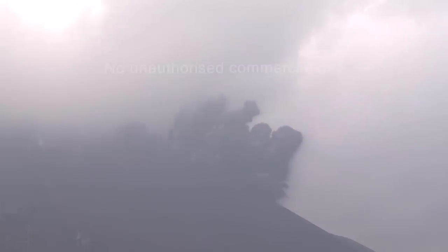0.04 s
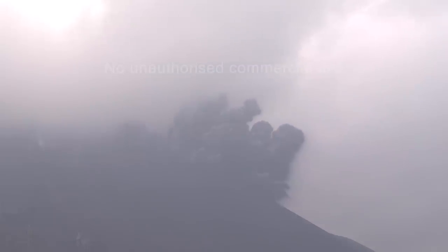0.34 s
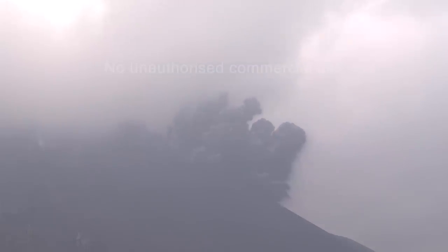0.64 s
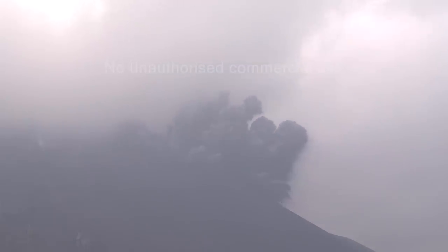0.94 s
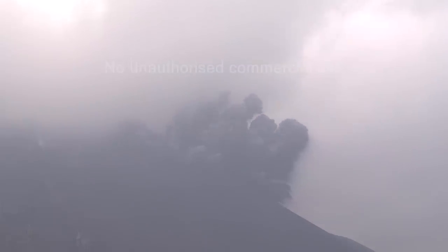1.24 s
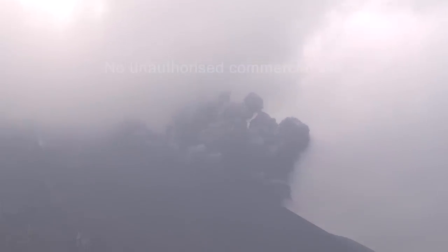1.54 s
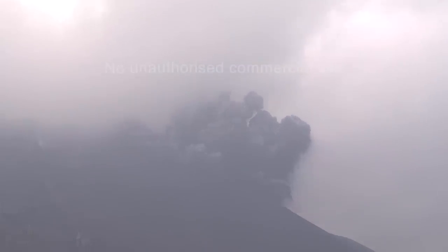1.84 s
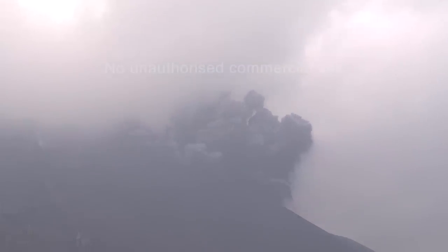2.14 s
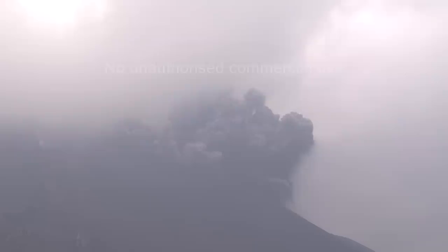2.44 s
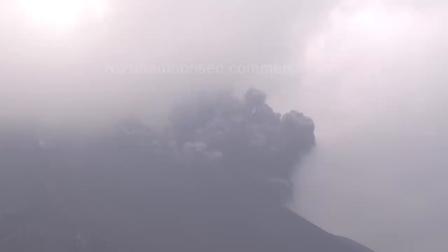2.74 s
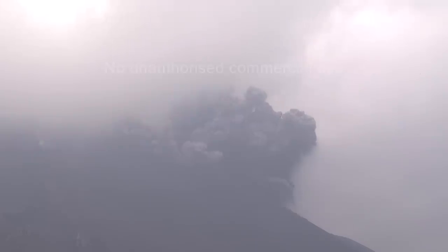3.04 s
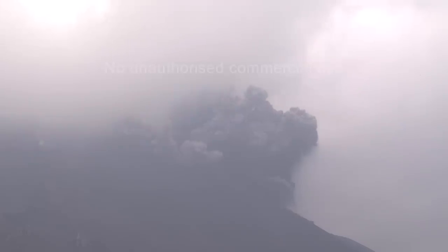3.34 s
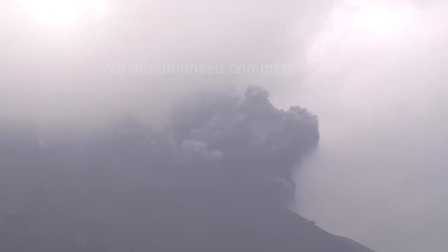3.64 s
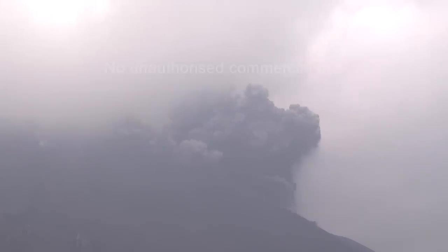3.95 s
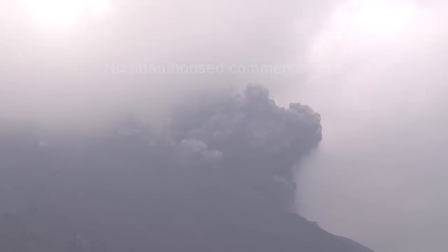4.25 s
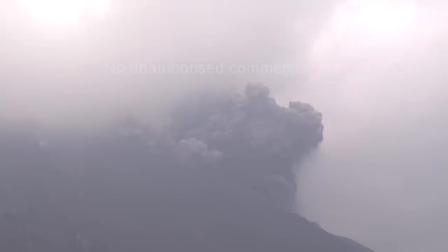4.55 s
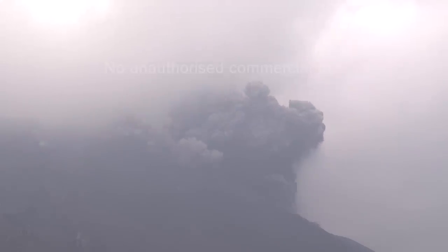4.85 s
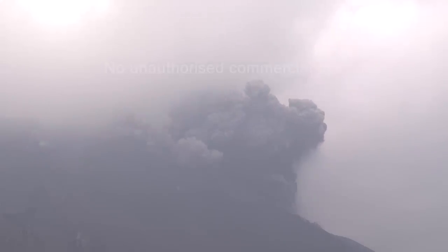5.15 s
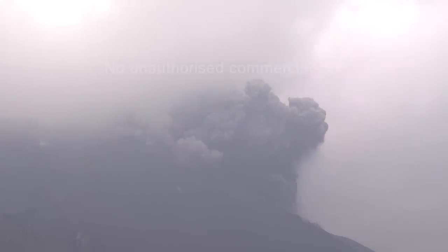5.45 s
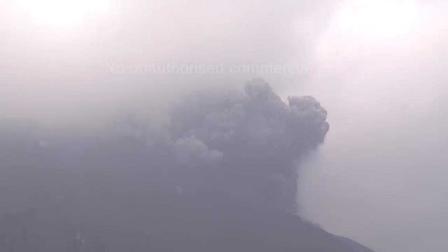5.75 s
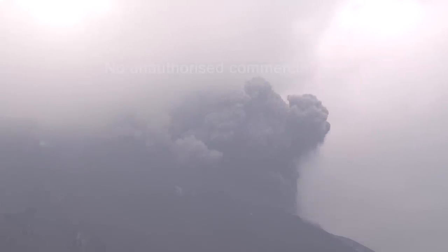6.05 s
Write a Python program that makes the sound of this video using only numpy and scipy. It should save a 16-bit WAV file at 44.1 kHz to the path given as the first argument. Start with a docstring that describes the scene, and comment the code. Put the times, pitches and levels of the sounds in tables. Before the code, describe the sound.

Wind buffets the microphone, a few dull pops hit, then a distant volcanic eruption roars and rumbles in surges.

```python
"""Far volcano in the wind

An ash cloud rolls down a far volcano while wind buffets the two ports of a camera microphone.
One blast overloads the ports with a few dull pops; then a deep roar, dulled by distance,
swells and sinks in surges. Faint dry rustles and crackles sit close by, over the microphone's hiss."""
import sys
import numpy as np
from scipy.fft import rfft, irfft, next_fast_len
from scipy.io import wavfile
from scipy.ndimage import map_coordinates

SR = 44100
rng = np.random.default_rng(int(sys.argv[2]) if len(sys.argv) > 2 else 0)


def wav_out(sig):
    """Save sig, one row per channel (or a flat mono array), as 16-bit PCM at SR to the path in sys.argv[1]."""
    wavfile.write(sys.argv[1], SR, np.round(np.clip(np.atleast_2d(sig).T, -1, 1) * 32767).astype(np.int16))


N = 278271

# Spectrum of each noise at the microphone: f/Hz, relative level/dB
BUFFET_COLOUR = [(8, -27.5), (22, -6.5), (45, -3.5), (75, -0.5), (130, 2), (260, -1), (390, -6.5),
                 (520, -12.5), (700, -20), (1000, -28), (1500, -41), (2200, -49.5), (3500, -70),
                 (7000, -110)]
EDDY_COLOUR = [(300, -16.5), (800, 4), (1500, 5), (2200, -1.5), (3100, -4.5), (3600, -9), (4400, -12.5),
               (5500, -20), (7500, -29), (11000, -39)]
RUSTLE_COLOUR = [(200, -39), (700, -15.5), (1900, 7), (3100, 2), (3700, -4.5), (4500, 2), (5700, -5.5),
                 (6900, -3), (7600, -7), (8400, -8.5), (9800, -18), (12000, -20.5), (15500, -25.5)]
HISS_COLOUR = [(100, 6.5), (1500, 5), (5000, 1), (10000, 0), (16000, -3)]
ROAR_COLOUR = [(30, -58), (120, -21.5), (300, -9), (400, -0.5), (640, 0), (760, -4.5), (900, -7),
               (1150, -11), (1450, -18.5), (1800, -28), (2300, -48.5), (4000, -62.5), (8000, -110)]
RUMBLE_COLOUR = [(10, -39), (50, -11.5), (85, -3), (115, 2.5), (170, -5), (240, 0), (310, -2), (400, -10.5),
                 (700, -26.5), (1500, -81.5), (4000, -120)]
HEAVE_COLOUR = [(6, -27.5), (20, -2.5), (32, 3), (45, -2.5), (62, -0.5), (85, -5), (130, -15.5),
                (300, -38.5), (1500, -100)]
SIZZLE_COLOUR = [(1500, -27), (4500, -0.5), (6200, 1), (8200, -4), (10500, -14), (15500, -10)]
# Likeness of left and right: f/Hz, correlation (-1..1)
BUFFET_LIKENESS = [(40, -0.63), (150, -0.69), (400, -0.69), (900, -0.4), (2000, 0.16)]  # largely opposite in left and right, so it sounds very wide
EDDY_LIKENESS = [(1000, 1), (3000, .65), (4300, 0.43), (5100, -.35), (6500, 0.73)]
RUSTLE_LIKENESS = [(2000, 0.6), (4200, 0.7), (5100, -0.4), (6200, 0.5), (8500, 0.68), (13000, .4)]
ROAR_LIKENESS = [(300, 0.99), (1000, 0.93), (2000, 0.38)]
RUMBLE_LIKENESS = [(40, 0.62), (300, 0.77)]

# Event levels are relative within each layer; every rise and fall spans 20 dB.
# Gusts on the ports, short ones riding on long: t/s, hold/s, rise/s, fall/s, buffet/dB, eddy/dB
GUSTS = [(0, .2, .1, .2, -28.5, -80.5), (.235, .36, .1, .26, -24.5, -59.5),
         (.665, 2.78, .13, .04, -24.8, -65), (.87, .2, .3, .11, -36, -59),
         (1.19, .49, .035, .42, -28.5, -58.8), (2.03, 1.42, .5, .025, -38, -57.7),
         (3.07, .11, .2, .11, -26.5, -64), (3.608, .02, .045, .075, -24, -56.5),
         (3.89, .045, .3, .2, -22, -55.5), (4.11, .1, .24, .22, -24, -65.5),
         (4.34, .3, .2, .11, -28.3, -69.5), (4.915, .135, .14, .19, -26.5, -69),
         (5.32, .02, .21, .3, -39, -76), (5.72, .045, .165, .28, -35.5, -74),
         (6.2, .09, .33, .2, -31.5, -73)]
# Soft dry rubs close by: t/s, hold/s, level/dB
RUBS = [(0, .27, -78), (2.32, .3, -78.5), (2.56, .07, -74.5), (2.88, .12, -69.3), (3.34, .07, -74.5),
        (4.3, .33, -77.5), (4.9, .27, -74.3), (5.31, .17, -77), (5.615, .28, -72), (5.705, .105, -67),
        (6.0, .16, -65.7), (6.22, .09, -70)]
# Crackles close by: t/s, level/dB, fall/s
CRACKLES = [(3.286, -64, .032), (3.383, -66.5, .037), (4.113, -57, .056), (4.298, -63, .05),
            (4.312, -67, .01), (4.492, -65, .007), (4.538, -60, .042), (4.886, -54.5, .026),
            (5.029, -66, .052), (5.158, -66, .044), (5.262, -66.5, .085), (5.562, -64.5, .04),
            (5.742, -53.3, .021), (5.807, -62, .035), (5.942, -53, .076), (6.26, -56, .054),
            (6.285, -52.5, .07)]
# Echoes off surfaces near the camera: left delay/s, right delay/s, level/dB
NEAR_ECHOES = [(.00192, .00195, -14), (.0043, 0.0053, -13), (.0087, .0101, -14), (0.013, .0126, -15.5)]
# Surges of the far eruption: t/s, hold/s, roar/dB, rumble/dB, heave/dB
SURGES = [(.23, .2, -53, -37, -42), (3.92, .075, -45.5, -41, -31.5), (4.115, .08, -41.5, -30.5, -29.5),
          (4.235, .08, -33, -26.5, -27), (4.41, .19, -34.2, -27, -32), (4.505, .016, -37, -20, -27),
          (4.87, .09, -40.5, -32.5, -33), (5.07, .085, -39, -26.3, -27), (5.71, .17, -43, -34, -30.5),
          (5.98, .33, -45.2, -39.3, -35.5)]
# Overloads of the ports in the blast: t/s, left/dB, right/dB, sizzle/dB
POPS = [(3.442, -27, -39.5, -87), (3.621, -12, -21, -82), (3.633, -20.5, -42, -63),
        (3.6542, -7.5, -9, -63.5), (3.676, -50.5, -18, -89)]
# Pressure shoves that come with the pops: t/s, hold/s, level/dB
SHOVES = [(3.452, 0.018, -27.5), (3.613, .02, -24.5)]
# Mismatch of the ports: f/Hz, left over right/dB
PORT_BALANCE = [(70, 1), (140, -3), (260, 0.72), (1000, 1), (4500, 2), (8000, -1), (12000, -0.5)]


def amp(db):
    """Decibels to gain."""
    return 10 ** (np.asarray(db) / 20)


def unit(x):
    """Scale to rms 1."""
    return x / np.sqrt(np.mean(x ** 2) + 1e-20)


def along(points, hz):
    """Read (Hz, value) points on a log axis."""
    f, v = np.transpose(points)
    return np.interp(np.log(hz + 1), np.log(f + 1), v)


def wobble(rate):
    """A smooth random curve with rate knots a second."""
    knots = rng.standard_normal(int(N * rate / SR) + 4)
    return map_coordinates(knots, [np.arange(N) * rate / SR])


def filtered(x, response):
    """Pass x through a response given as a function of frequency."""
    size = next_fast_len(N + SR // 2)
    return irfft(rfft(x, size) * response(np.fft.rfftfreq(size, 1 / SR)), size)[..., :N]


def rush(colour, likeness, drive=1):
    """Coloured stereo noise of rms 1; drive makes it lumpy or grainy."""
    def mid_side(hz):
        width = np.arccos(np.clip(along(likeness, hz), -.99, .99)) / 2
        return amp(along(colour, hz)) * np.array([np.cos(width), np.sin(width)])
    mid, side = filtered(rng.standard_normal((2, N)) * drive, mid_side)
    return unit(np.array([mid + side, mid - side]))


def lean(x, left_db):
    """Shift a stereo sound toward the left port."""
    return x * amp([[left_db / 2], [-left_db / 2]])


def swell(start, hold, rise, fall):
    """Gain that reaches 1 at start, holds and dies away; rise and fall are seconds per 20 dB."""
    age = np.arange(N) / SR - start
    return amp(-20 * (np.maximum(-age, 0) / rise + np.maximum(age - hold, 0) / fall))


def together(gains, floor_db=-120):
    """Joint gain of unrelated sounds over a steady floor."""
    return np.sqrt(sum(g ** 2 for g in gains) + amp(floor_db) ** 2)


def gusts():
    """Gains of the large and fine eddies: a gust swells both, and the fine ones thin out as it goes on."""
    large, fine, t = [], [], np.arange(N) / SR
    sag_db_per_s = 5.1
    for start, hold, rise, fall, buffet_db, eddy_db in GUSTS:
        gust = swell(start, hold, rise, fall)
        large.append(amp(buffet_db) * gust)
        fine.append(amp(eddy_db - sag_db_per_s * np.maximum(t - start, 0)) * gust)
    return together(large, floor_db=-48), together(fine, floor_db=-89)


def wind(buffet_gain, eddy_gain):
    """Wind right on the microphone: large eddies thump the ports, each carrying finer, hissing ones."""
    lumps = wobble(45)
    buffet = rush(BUFFET_COLOUR, BUFFET_LIKENESS, drive=amp(1.4 * lumps))
    fizz = rush(EDDY_COLOUR, EDDY_LIKENESS, drive=amp(1.7 * lumps + 2.0 * wobble(350)))
    return lean(buffet_gain * buffet, left_db=3.0) + amp(3.0) * eddy_gain * fizz


def rustle(buffet_gain):
    """Dry grains close to the microphone: a faint bed stirred by the wind, held rubs, quick crackles."""
    rubs = [amp(db) * swell(start, hold, rise=.11, fall=.085) for start, hold, db in RUBS]
    crackles = [amp(db) * swell(start, hold=0, rise=.011, fall=fall) for start, db, fall in CRACKLES]
    stir = amp(-57.3) * buffet_gain
    gain = amp(-0.5) * together(rubs + crackles + [stir])
    grains = rush(RUSTLE_COLOUR, RUSTLE_LIKENESS, drive=amp(2.6 * wobble(1500) + 2.2 * wobble(110)))
    return lean(near_echoes(gain * grains), left_db=2.3)


def near_echoes(x):
    """Surfaces close to the camera echo a sound and comb its colour, differently at each port."""
    def comb(hz):
        return 1 + sum(amp(db) * np.exp(-2j * np.pi * hz * np.array([[left], [right]]))
                       for left, right, db in NEAR_ECHOES)
    return filtered(x, comb)


def hiss():
    """The microphone's own faint noise, almost unrelated between the ports."""
    return amp(-80.5) * rush(HISS_COLOUR, likeness=[(1000, .05)])


def surges():
    """Gains of roar, rumble and heave: each surge swells, holds, drops and rolls on along the slopes."""
    body, rumble, heave = [], [], []
    rise = .144
    for start, hold, roar_db, rumble_db, heave_db in SURGES:
        roll = amp(-16) * swell(start, hold, rise, fall=.95)
        surge = np.maximum(swell(start, hold, rise, fall=.137), roll)
        body.append(amp(roar_db) * surge)
        rumble.append(amp(rumble_db) * surge)
        heave.append(amp(heave_db) * swell(start, hold, rise=.17, fall=.177))
    shoves = [amp(db) * swell(start, hold, rise=.032, fall=.032) for start, hold, db in SHOVES]
    return (together(body, floor_db=-61), together(rumble, floor_db=-57),
            together(heave + shoves, floor_db=-46.5))


def roar():
    """The ash cloud, far off and dull: roar and rumble tumble together over slow heaves of pressure."""
    roar_gain, rumble_gain, heave_gain = surges()
    tumble = wobble(30)
    churn = amp(tumble + 0.98 * wobble(120))
    body = amp(2.2) * roar_gain * rush(ROAR_COLOUR, ROAR_LIKENESS, drive=churn)
    rumble = rumble_gain * rush(RUMBLE_COLOUR, RUMBLE_LIKENESS, drive=amp(1.2 * tumble))
    heave = heave_gain * rush(HEAVE_COLOUR, RUMBLE_LIKENESS)
    return body + lean(rumble, left_db=1.5) + lean(heave, left_db=1.0)


def pops():
    """An overloaded port jumps in pressure, leaks back and swings under; it sizzles until it recovers."""
    thuds, sizzle_gain, t = np.zeros((2, N)), np.zeros(N), np.arange(N) / SR
    jump_s, leak_s, undershoot_s, recovery_s = .0012, .0047, .025, .021
    for start, left_db, right_db, sizzle_db in POPS:
        age = np.maximum(t - start, 0)
        jump = 1 - np.exp(-(age / jump_s) ** 2)
        leak = 1.94 * np.exp(-age / leak_s) - 0.23 * np.exp(-age / undershoot_s)
        thuds += amp([[left_db], [right_db]]) * jump * leak
        sizzle_gain += amp(sizzle_db) * jump * (age < recovery_s)
    return thuds + sizzle_gain * rush(SIZZLE_COLOUR, likeness=[(1000, .05)])


def scene():
    """Wind and pops on the microphone, the volcano far off, rustle close by, hiss underneath."""
    buffet_gain, eddy_gain = gusts()
    return wind(buffet_gain, eddy_gain) + pops() + roar() + rustle(buffet_gain) + hiss()


def record(dry):
    """The camera microphone: two ports of slightly different colour, and nothing above its band limit."""
    top_hz = 15720
    port_share = np.array([[.5], [-.5]])
    return filtered(dry, lambda hz: (hz < top_hz) * amp(along(PORT_BALANCE, hz) * port_share))


dry = scene()
out = record(dry)
wav_out(out)
```